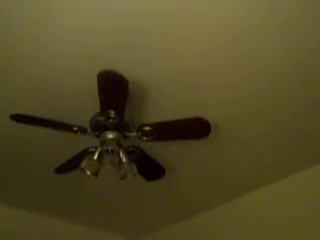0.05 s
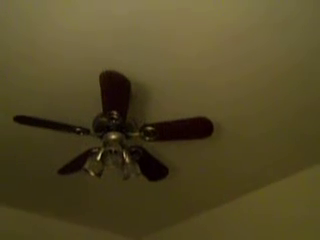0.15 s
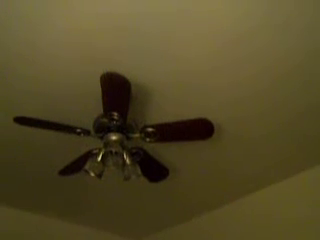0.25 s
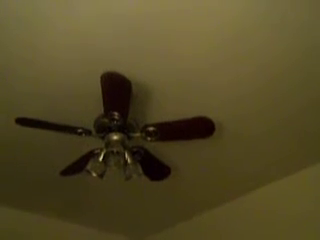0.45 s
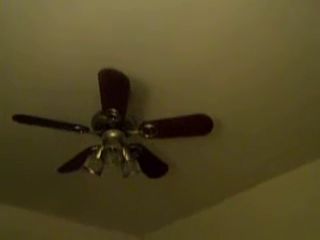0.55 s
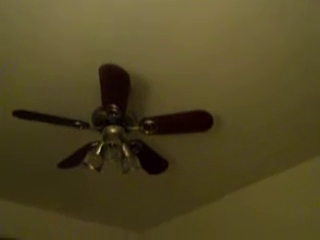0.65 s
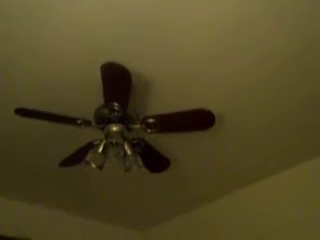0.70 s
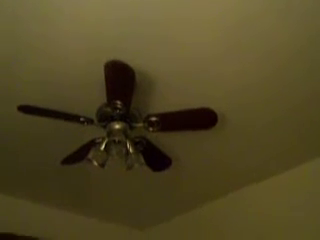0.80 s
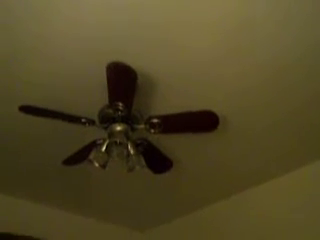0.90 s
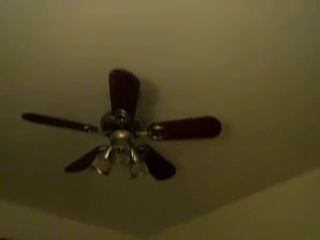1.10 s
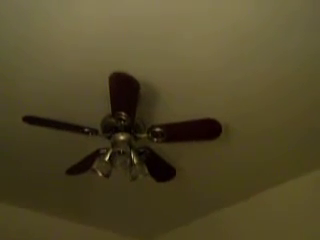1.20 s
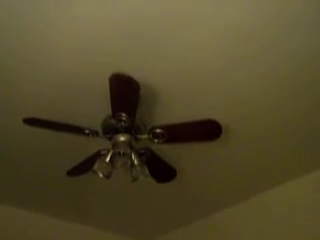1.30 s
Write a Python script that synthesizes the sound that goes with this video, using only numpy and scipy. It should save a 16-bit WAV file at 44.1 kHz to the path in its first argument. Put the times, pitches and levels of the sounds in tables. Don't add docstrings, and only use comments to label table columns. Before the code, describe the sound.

Dull knocks thud through a ceiling, each harder than the last, in a quiet hissy room

```python
import sys
import numpy as np
from scipy import signal
from scipy.fft import rfft, irfft
from scipy.io import wavfile

SR = 44100
rng = np.random.default_rng(int(sys.argv[2]) if len(sys.argv) > 2 else 0)


def dump_mix(stems):
    frames = np.atleast_2d(stems).T
    limited = np.clip(frames, -1, 1)
    pcm = np.round(limited * 32767).astype(np.int16)
    wavfile.write(sys.argv[1], SR, pcm)


def gain_from_db(level_db):
    decades = np.asarray(level_db, float) / 20
    return 10 ** decades


N = 59535
EVENT_N = SR // 2 + SR // 4

# (time [s], joist level [dB], bay level [dB], board level [dB], crack level [dB])
KNOCK_EVENTS = [
    (-.085, -9.5, -15.5, -10, -54),
    (.199, -5.5, -14.5, -8.5, -30),
    (.448, -1, -2.5, -3.5, -29.5),
    (0.6797, 0.96, 2.8, 0.24, -20),
]
# (frequency [Hz], level [dB], T60 [s], rise time [s])
JOIST_MODES = [(68.1, -42, 0.33, 0.024), (102.4, -45, 0.4, 0.014), (126.1, -29.5, 0.28, 0.079),
               (145.2, -35, 0.33, 0.053), (171.5, -29.5, 0.26, 0.046), (204.6, -35, 0.26, 0.0012),
               (239.2, -35.5, 0.41, 0.11), (263.4, -37, 0.31, 0.021), (291.8, -28, 0.2, 0.012),
               (306, -31.5, 0.2, 0.014)]
BAY_MODES = [(339.1, -19.5, 0.22, 0.036), (365.6, -23, 0.28, 0.012), (424, -25.5, 0.26, 0.018),
             (388, -47.5, 0.53, 0.019)]
BOARD_MODES = [(199, -29, 0.043, .0015), (447, -38.5, 0.48, 0.024), (476.5, -38, 0.39, 0.0062),
               (543.5, -35, 0.31, 0.0061), (574, -25.5, 0.11, 0.0034), (589.7, -28, 0.21, 0.0014),
               (635, -35, 0.38, 0.009), (694, -32, 0.25, 0.0023), (770.5, -32, .17, 0.0011),
               (823, -30, 0.038, 0.0014), (935, -43.5, 0.49, 0.0016)]
DECAY_BEND = (1.757, 1.087, 0.96)
# (delay [s], level [dB])
WALL_ECHOES = [(.041, -14.5), (.060, -8.5), (.077, -11)]
# (delay [s], level [dB])
CLICK_ARRIVALS = [(.0009, -13), (.0021, -11), (.0029, -5), (.0050, .1), (.0063, -9), (.0087, -8),
                  (.0124, -10)]
# (frequency [Hz], level [dB])
CRACK_SPECTRUM = [(700, -23), (1150, -2), (1420, -1.5), (1650, -8.5), (2000, 1.4), (2500, -3.4), (3200, -6),
                  (4000, -10.5), (6300, -31.5)]
TICK_SPECTRUM = [(300, -16), (900, -13), (1900, -13.5), (2250, -5), (2500, 3), (3100, 0.3), (4200, -2),
                 (5200, -12.5), (7000, -34)]
# (frequency [Hz], T60 [s])
ROOM_T60 = [(80, 1), (250, 0.59), (700, 0.34), (1500, 0.34), (2600, 0.28), (4000, 0.16), (7000, 0.13)]
# (time [s], level [dB], frequency [Hz], length [s])
FOOTFALLS = [(0.087, -57.5, 91.2, 0.16), (0.923, -54.5, 93.7, 0.092), (1.001, -55, 103, 0.041)]
# (frequency [Hz], level [dB])
RUMBLE_SPECTRUM = [(12, -92.5), (20, -15), (64, -10), (189, -14), (232, -16.5), (310, -11), (387, -22.5),
                   (900, -30.5), (1170, -60.5), (1980, -120)]
HISS_SPECTRUM = [(290, -49), (500, -1), (3200, -7.5), (3590, -6), (6960, -14), (7210, -13), (8000, -9),
                 (10400, -45.5), (17600, -120)]
# (frequency [Hz], level [dB])
WHINE_TONES = [(7381.3, -68), (7837.5, -88), (7867.3, -87), (7897.3, -89)]
# (frequency [Hz], gain [dB])
CONVERTER_EDGE = [(7000, 0.73), (7700, -4.5), (8100, -11.5), (8500, -18), (8950, -32)]


def knock(joists_db, bay_db, board_db, crack_db, tail, scatter):
    blow_s, diffuse_db = 0.0049, 5
    t = np.arange(EVENT_N) / SR
    alternating = (-1) ** np.arange(20)
    joists = gain_from_db(joists_db) * ring(JOIST_MODES, DECAY_BEND[0], t, alternating)
    bay = gain_from_db(bay_db) * ring(BAY_MODES, DECAY_BEND[1], t, alternating)
    board = -gain_from_db(board_db) * ring(BOARD_MODES, DECAY_BEND[2], t, np.ones(20))
    crack = gain_from_db(crack_db) * click(CRACK_SPECTRUM, tail, 5, scatter)
    blow = (joists + bay + 0.75 * board) * np.exp(-t / blow_s)
    body = joists + bay + board + crack
    for delay_s, db in WALL_ECHOES:
        add(body, delay_s, gain_from_db(db + 11.5) * blow)
    return body + gain_from_db(diffuse_db) * signal.fftconvolve(blow, tail)[:len(t)]


def ring(modes, bend, t, signs):
    total = np.zeros(len(t))
    for (hz, db, t60_s, rise_s), sign in zip(modes, signs):
        decay = gain_from_db(db - 60 * (t / t60_s) ** bend)
        swell = 1 - np.exp(-t / abs(rise_s))
        total += sign * decay * swell * np.sin(2 * np.pi * hz * t)
    return total


def click(spectrum, tail, wet_db, scatter):
    scatter_db, scatter_s = 2.5, 0.0005
    x = np.zeros(EVENT_N)
    for k, (delay_s, db) in enumerate(CLICK_ARRIVALS):
        at = round((delay_s + scatter_s * scatter[k + 10]) * SR)
        x[at] = (-1) ** k * gain_from_db(db + scatter_db * scatter[k])
    n = np.arange(len(x))
    x = colour(x, spectrum) * np.clip(n / 20, 0, 1) * (n < SR // 20)
    return wet(x / abs(x).max(), tail, wet_db)


def tick(tail):
    return gain_from_db(-27) * click(TICK_SPECTRUM, tail, 4, np.zeros(20))


def room():
    hz, t, bands = signal.stft(rng.standard_normal(SR), SR, nperseg=512)
    t60_s = np.abs(read(ROOM_T60, hz))[:, None]
    tail = signal.istft(bands * gain_from_db(-60 * t / t60_s), SR, nperseg=512)[1]
    tail = tail * np.clip(np.arange(len(tail)) / SR / 0.002, 0, 1)
    return tail / np.linalg.norm(tail)


def wet(x, tail, db):
    return x + gain_from_db(db) * signal.fftconvolve(x, tail)[:len(x)]


def footfall(db, hz, length_s):
    t = np.arange(0, 2 * length_s, 1 / SR)
    swell = 2 * t / length_s * np.exp(-2 * (t / length_s) ** 2)
    return gain_from_db(db + 11.5) * swell * np.sin(2 * np.pi * hz * t)


def background():
    rumble_db, hiss_db = -54.5, -56
    t = np.arange(N) / SR
    mix = gain_from_db(rumble_db) * evened(colour(rng.standard_normal(N), RUMBLE_SPECTRUM))
    mix += gain_from_db(hiss_db) * evened(colour(rng.standard_normal(N), HISS_SPECTRUM))
    for hz, db in WHINE_TONES:
        mix += gain_from_db(db + 6) * np.sin(2 * np.pi * hz * t)
    return mix


def evened(x):
    return x / np.sqrt(np.mean(x ** 2) + 1e-20)


def read(points, hz):
    f, value = np.transpose(points)
    return np.interp(np.log(hz + 1), np.log(f + 1), value)


def colour(x, points, outside_db=-70):
    hz = np.fft.rfftfreq(len(x), 1 / SR)
    below = (points[0][0] / 2, outside_db)
    above = (points[-1][0] * 1.06, outside_db)
    return irfft(rfft(x) * gain_from_db(read([below] + list(points) + [above], hz)), len(x))


def add(mix, time_s, sound):
    k = round(time_s * SR)
    sound = sound[max(-k, 0):]
    part = mix[max(k, 0):][:len(sound)]
    part += sound[:len(part)]


def scene():
    mix, tail = background(), room()
    scatters = rng.uniform(-1, 1, (len(KNOCK_EVENTS), 20))
    for (time_s, *levels_db), scatter in zip(KNOCK_EVENTS, scatters):
        add(mix, time_s, knock(*levels_db, tail, scatter))
    add(mix, 1.0173, tick(tail))
    for time_s, *step in FOOTFALLS:
        add(mix, time_s, footfall(*step))
    return mix[None]


def roll_off(x):
    return signal.sosfilt(signal.butter(12, 8800, fs=SR, output="sos"), x)


def record(dry):
    limit, rate_hz, top_hz = 0.3, 16000, 8950
    hz = np.fft.rfftfreq(N, 1 / SR)
    limited = limit * np.tanh(dry / limit)
    band = np.clip((rate_hz / 2 - hz) / 300 + 0.77, 0, 1) * (hz < rate_hz / 2)
    low = irfft(rfft(limited) * band, N)
    mirrored = low * (1 + 2 * np.cos(2 * np.pi * rate_hz * np.arange(N) / SR))
    edge = gain_from_db(read(CONVERTER_EDGE, hz)) * (hz < top_hz)
    return roll_off(irfft(rfft(mirrored) * edge, N))


dry = scene()
out = record(dry)
dump_mix(out)
```